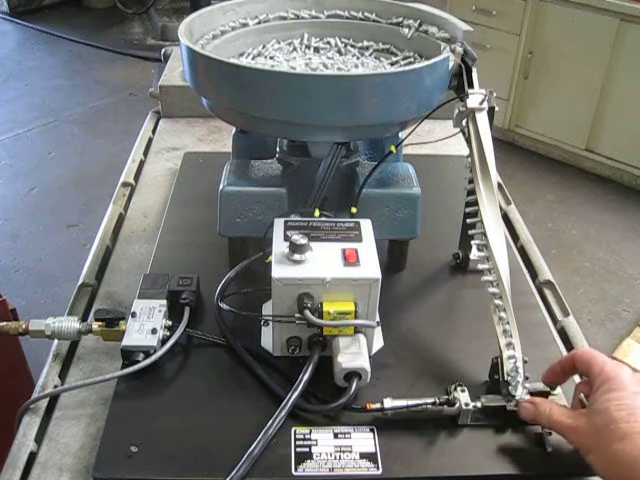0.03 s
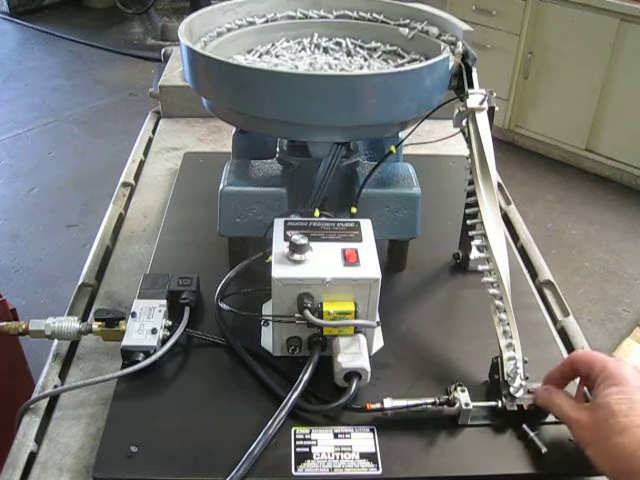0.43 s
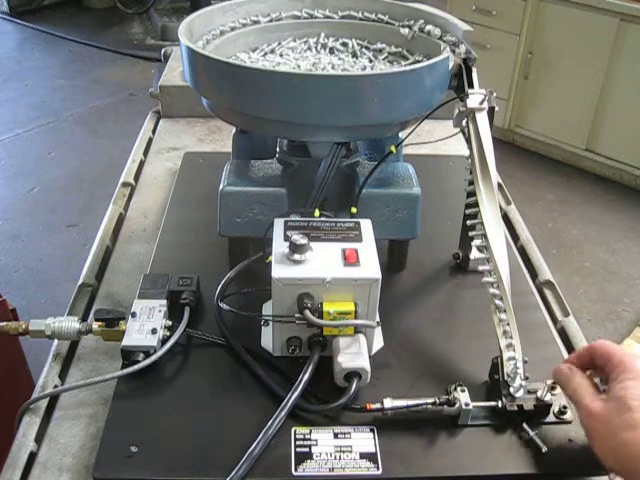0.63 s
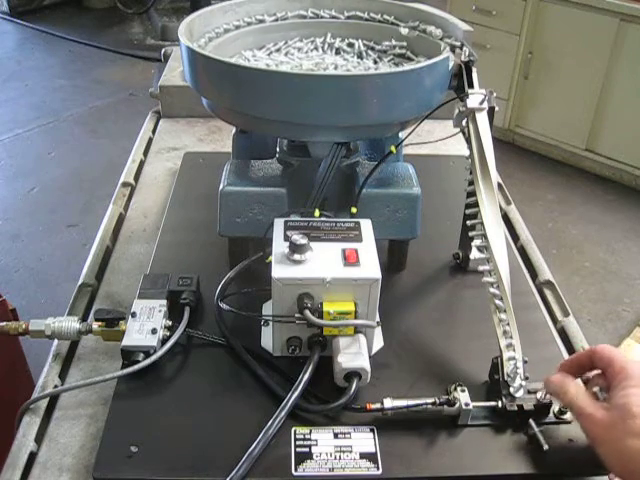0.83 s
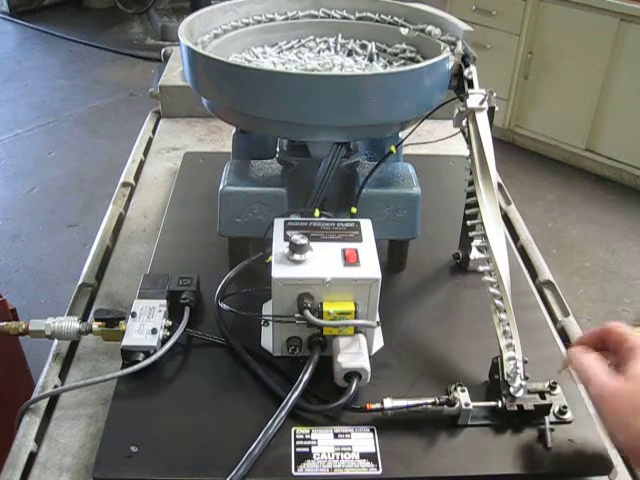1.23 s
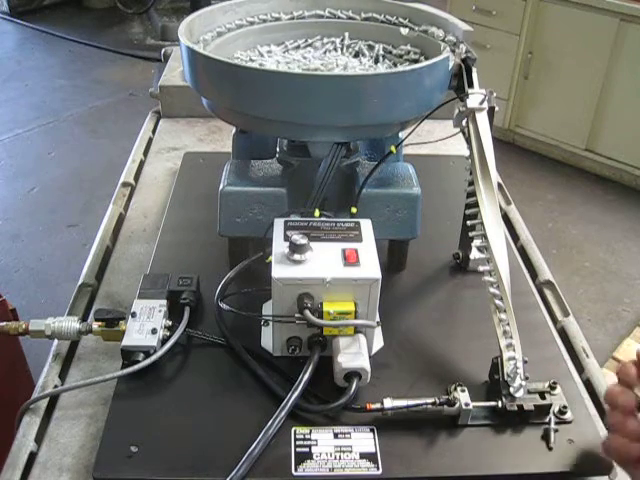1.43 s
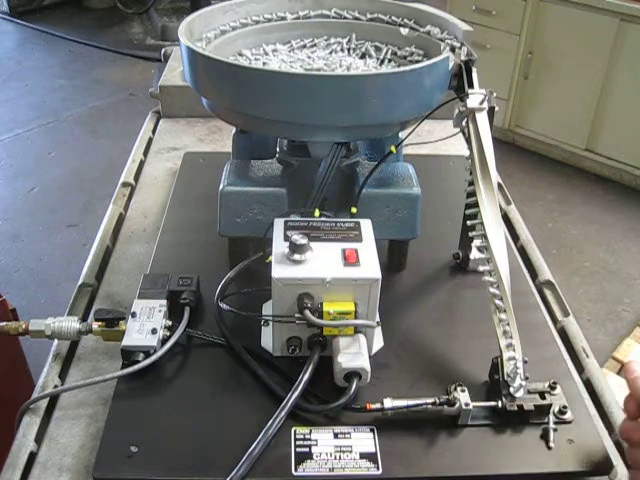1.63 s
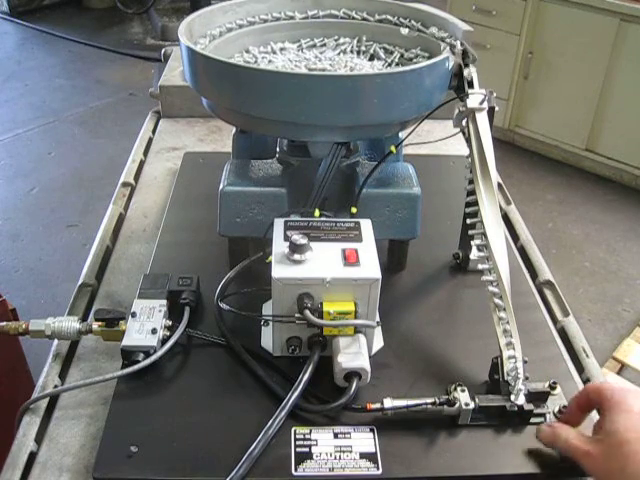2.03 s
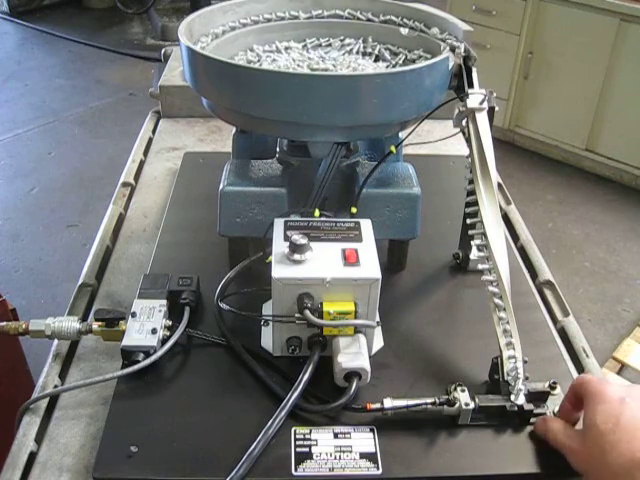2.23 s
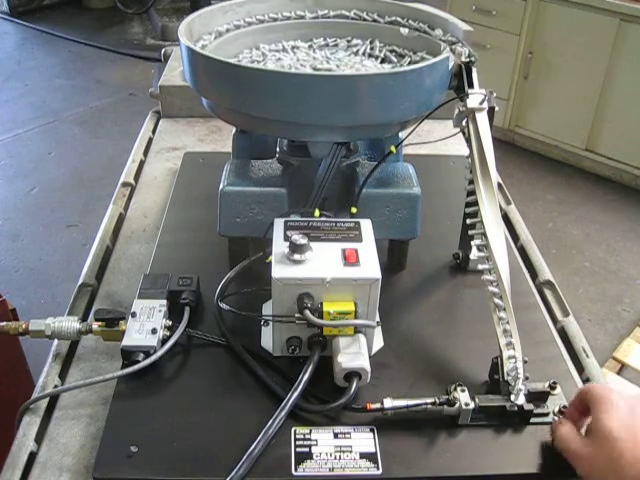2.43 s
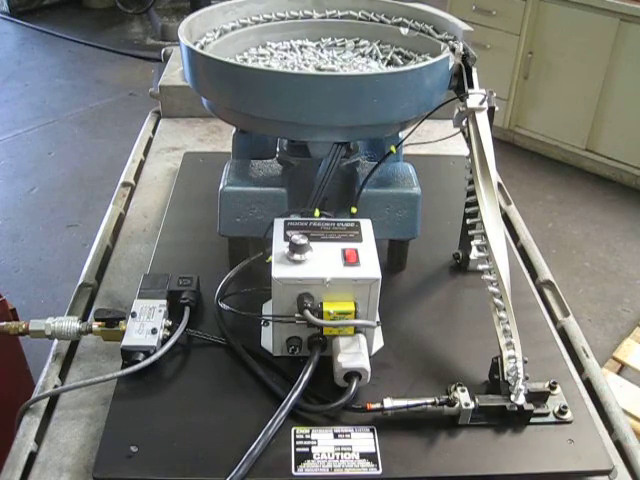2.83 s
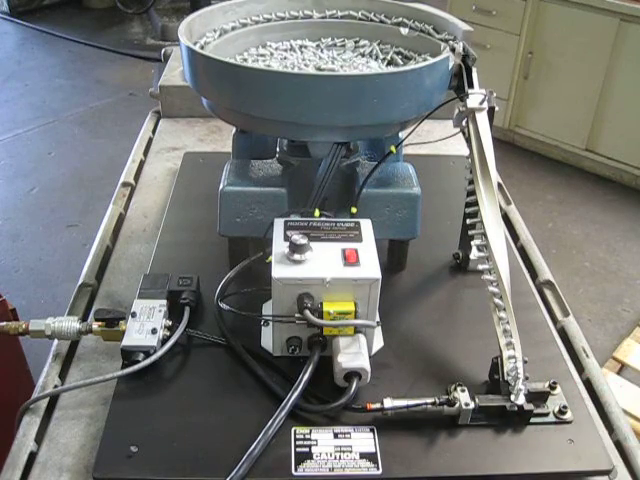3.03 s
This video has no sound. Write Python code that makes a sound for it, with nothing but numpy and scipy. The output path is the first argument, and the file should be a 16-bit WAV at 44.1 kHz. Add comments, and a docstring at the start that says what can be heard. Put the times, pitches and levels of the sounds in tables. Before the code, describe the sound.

A vibrating bowl feeder rattles metal studs, pausing with an air hiss and clack, then restarting.

```python
"""A vibratory bowl feeder rattles a heap of steel studs in its ringing bowl, tossed by a humming magnet.
It starts, runs, dies down as a pneumatic slide hisses, squeaks and slams at the track end,
then restarts and stops again. The slam leaves a lingering ring. Single studs clack on the track
and the bench gives a few dull booms. The hard workshop answers briefly, over a low rumble."""
import sys
import numpy as np
from scipy import signal
from scipy.fft import rfft, irfft, next_fast_len
from scipy.io import wavfile
from scipy.ndimage import map_coordinates

SR = 44100
rng = np.random.default_rng(int(sys.argv[2]) if len(sys.argv) > 2 else 0)


def transcribe(u):
    """Save the signal u as a 16-bit wav file named by the first command-line argument.

    u: samples, shape (n,) or (channels, n), limited to [-1, 1]; the rate is SR.
    q: integer samples, one column per channel.
    """
    v = np.clip(np.atleast_2d(u).T, -1, 1)
    q = np.round(v * 32767).astype(np.int16)
    wavfile.write(sys.argv[1], SR, q)


N = 136710
SHAKE_HZ, FULL_DRIVE_DB = 120, -43
STRIKE_DB = 12  # a first contact, above the flurry that follows

# The rattle's broad tone. Each row: frequency in Hz, gain in dB.
RATTLE_EQ = [(150, -29.5), (400, -16), (720, -7), (1100, 1), (5000, -3.5), (8500, -6.5), (11000, -11),
             (13000, -20.5), (15800, -29.5)]
# Resonances of bowl and studs. Each row: centre in Hz, width in Hz, lift in dB.
BOWL_MODES = [(652, 25, 9), (1495, 90, -7), (1620, 110, 5.5), (1809, 72, 5), (1938, 55, 6.5),
              (2226, 105, 8), (2425, 70, -6.5), (2728, 35, 6), (2925, 140, 6), (3121, 46, 10.5),
              (3542, 105, 11), (3830, 220, 4.5), (3982, 70, 9.5), (4115, 70, 7), (4510, 55, 6),
              (5560, 380, 10.5), (5694, 32, 6.5), (5922, 35, 5), (6270, 650, 8.5), (6743, 105, 11),
              (7192, 100, 4.5), (8075, 650, 9), (8671, 190, 8), (9143, 80, 9), (9421, 35, 11),
              (9824, 45, 10), (10203, 310, 10), (10775, 260, 7), (11266, 145, 7.5), (12371, 520, 8),
              (14350, 400, 10)]
def rattle(body_db, treble_db):
    """Tossed studs ring the bowl's main resonances and a thicket of fine ones; the treble pulses most."""
    fine_db = 1.2 * rng.standard_normal(400)
    fine_hz = np.linspace(0, SR / 2, len(fine_db))
    bowl = lambda hz: along(RATTLE_EQ, hz) + lifts(BOWL_MODES, hz) + np.interp(hz, fine_hz, fine_db)
    low_share = lambda hz: 1 / (1 + (hz / 2770) ** 8)  # crossover from body to treble
    body_eq = lambda hz: bowl(hz) + 10 * np.log10(low_share(hz) + 1e-9)
    treble_eq = lambda hz: bowl(hz) + 10 * np.log10(1 - low_share(hz) + 1e-9)
    body = unit(coloured(impacts(pulsing=0.14), body_eq))
    treble = unit(coloured(impacts(pulsing=0.42), treble_eq))
    jostle = amp(0.39 * wobble(50))
    return jostle * (amp(body_db - 1) * body + amp(treble_db) * sizzle(treble, treble_db))


def impacts(pulsing, per_s=6500, spread_db=2.5):
    """Stud contacts of random size crowd into one part of each shake."""
    shake = 1 + pulsing * np.cos(2 * np.pi * SHAKE_HZ * np.arange(N) / SR)
    hit = rng.random(N) < shake * per_s / SR
    return hit * rng.choice([-1, 1], N) * amp(spread_db * rng.standard_normal(N))


def sizzle(treble, treble_db, corner_hz=10700, neutral_db=-32.5):
    """Harder contacts are shorter, so the top of the rattle grows faster than the rest."""
    hz = np.fft.rfftfreq(N, 1 / SR)
    top = irfft(rfft(treble) / (1 + (corner_hz / (hz + 1)) ** 10), N)
    return treble + top * (amp(0.45 * (treble_db - neutral_db)) - 1)


# The hum's partials. Each row: harmonic number, offset in dB at full drive, dB gained per dB of drive.
HUM_PARTIALS = [(1, 0.5, 1.5), (2, -9.5, 1.54), (3, -3, 1.48), (4, -19, 1.6), (5, -16.5, 1)]
def magnet_hum(drive_db, overtone_lag_s=0.04):
    """The magnet pulls twice per mains cycle; its overtones swell later and waver more."""
    t = np.arange(N) / SR
    late_db = np.minimum(drive_db, np.interp(t - overtone_lag_s, t, drive_db))
    out = np.zeros(N)
    for k, offset_db, growth in HUM_PARTIALS:
        push_db = (late_db if k > 1 else drive_db) - FULL_DRIVE_DB
        waver_db = 0.25 * k * wobble(8.84)
        level = amp(FULL_DRIVE_DB + offset_db + growth * push_db + waver_db)
        out += np.sqrt(2) * level * np.sin(2 * np.pi * (k * SHAKE_HZ * t + rng.random()))
    return out


# The shell's lowest modes. Each row: centre in Hz, width in Hz, lift in dB.
SHELL_MODES = [(831, 60, 20.5), (884.3, 43, 19.5)]
def bowl_shell(drive_db):
    """Only a hard shake throws the heap enough to ring the bowl's hollow shell."""
    eq = lambda hz: lifts(SHELL_MODES, hz) - 20 * np.abs(np.log2((hz + 1) / SHELL_MODES[0][0]))
    level_db = -42.5 + 1.92 * (drive_db - FULL_DRIVE_DB)
    return amp(level_db) * unit(coloured(impacts(pulsing=0.14), eq))


# Stud clacks and the slam's after-ring. Each row: start in seconds, level in dB,
# ring centre and width in Hz, ring lift in dB, hold and t60 in seconds.
METAL_RINGS = [(0.08, -40.5, 3820, 3000, 7, 0.0049, 0.024), (0.214, -25, 2270, 2400, 12, 0.0049, 0.016),
               (1.192, -22.5, 2480, 2000, 1, .005, 0.019), (1.252, -24.5, 5800, 2500, 9, 0.008, 0.028),
               (1.425, -21.5, 9700, 5000, 10, 0.0036, 0.043), (1.774, -36.5, 1720, 300, 17, .03, 0.44),
               (2.0583, -38, 4500, 4000, 9, 0.0018, 0.015), (2.089, -32.5, 1860, 1490, 6, 0.012, 0.05),
               (2.147, -26.5, 11100, 5000, 4, 0.0045, .04), (2.7155, -28, 3020, 500, 16, 0.0066, 0.02),
               (2.7741, -24.5, 9400, 2500, 16, 0.0018, 0.017),
               (2.7757, -20, 2000, 1100, 14.5, 0.0027, 0.023),
               (2.788, -34.5, 1400, 1300, 14, 0.0058, 0.027), (2.81, -26, 5700, 620, 6, 0.0027, 0.015),
               (2.844, -24.5, 5350, 2400, 15, 0.0003, 0.0036), (3.072, -44.5, 3560, 3500, 12, 0.0019, .02)]
# The tone they all share. Each row: frequency in Hz, gain in dB.
METAL_EQ = [(200, -57), (650, -5.5), (1100, 1.5), (8000, 3.5), (11000, -3), (16000, -19)]
def clacks_and_after_ring():
    """Stud clacks, each with its own ring, plus a lingering ring near 1.7 kHz just after the slam."""
    out = np.zeros(N)
    for start, db, centre, width, lift, hold, t60 in METAL_RINGS:
        eq = lambda hz: along(METAL_EQ, hz) + lifts([(centre, width, lift)], hz)
        add(out, start, amp(db) * burst(hold, t60, eq, strike=amp(STRIKE_DB)))
    return out


# Valve spurts. Each row: start and hold in seconds, level in dB, t60 in seconds,
# treble tilt in dB per octave.
AIR_SPURTS = [(1.634, 0.0067, -17.5, 0.015, 5), (1.663, 0.0365, -23, 0.015, 2.5)]
# The hiss before its tilt. Each row: frequency in Hz, gain in dB.
AIR_EQ = [(80, -14), (1000, 2.5), (3000, -0.5), (5000, 3), (9000, 1), (10000, -3), (11300, 0.5),
          (13500, -10), (16000, -15)]
def valve_hiss():
    """The slide's valve lets out short, bright jets of air."""
    out = np.zeros(N)
    for start, hold, db, t60, tilt in AIR_SPURTS:
        eq = lambda hz: along(AIR_EQ, hz) + tilt * np.log2(1 + hz / 1000)
        add(out, start, amp(db) * burst(hold, t60, eq))
    return out


# The squeak's partials. Each row: frequency in Hz, relative level in dB.
SQUEAK_PARTIALS = [(6150, -2.5), (10400, -11), (11900, -8)]
def slide_squeak(start_s=1.6428, level_db=-11.5):
    """The slide gives a tiny, high squeak as it sets off."""
    out = np.zeros(N)
    for hz, db in SQUEAK_PARTIALS:
        add(out, start_s, amp(level_db + db) * ring(hz, hold_s=0.0017, t60_s=0.013))
    return out


# The end stop's ring. Each row: frequency in Hz, level in dB, t60 in seconds.
STOP_MODES = [(475, -27, 0.045), (1294, -25, 0.038), (1700, -24.5, 0.029), (2180, -23.5, 0.018),
              (3170, -17, 0.026), (3610, -22, 0.016)]
# The struck plate's tone. Each row: frequency in Hz, gain in dB.
PLATE_EQ = [(100, -56), (480, -6), (800, -4), (1600, 0), (3400, 5), (7000, 0.5), (12000, -16), (16000, -22)]
def slide_slam(start_s=1.6985, lag_at_1khz_s=0.0055):
    """The slide slams into its stop; the plate's low bending waves arrive last."""
    plate_eq = lambda hz: along(PLATE_EQ, hz)
    crack = amp(-13.5) * burst(0.0015, 0.02, plate_eq, strike=2 * amp(STRIKE_DB))
    slam = crack + sum(amp(db) * ring(hz, 0.004, t60) for hz, db, t60 in STOP_MODES)
    hz = np.fft.rfftfreq(len(slam), 1 / SR)
    dispersion = np.exp(-4j * np.pi * lag_at_1khz_s * np.sqrt(1000 * hz))
    out = np.zeros(N)
    add(out, start_s, irfft(rfft(slam) * dispersion, len(slam)))
    return out


# Bench thuds. Each row: start in seconds, level in dB, t60 in seconds.
BENCH_HITS = [(0, -46, 0.39), (1.636, -35, 0.057), (1.663, -37, 0.054)]
# The bench's dull tone. Each row: frequency in Hz, gain in dB.
BENCH_EQ = [(50, -15), (130, 7.5), (400, 1.5), (1500, -46)]
def bench_booms():
    """The bench top booms low and briefly."""
    out = np.zeros(N)
    for start, db, t60 in BENCH_HITS:
        add(out, start, amp(db) * burst(0, t60, lambda hz: along(BENCH_EQ, hz)))
    return out


# The reverb's decay. Each row: frequency in Hz, t60 in seconds.
ROOM_DECAY = [(200, 1), (1800, 0.31), (6000, 0.48), (14000, 0.13)]
def workshop_reverb(send):
    """The hard room answers; each frequency dies at its own speed."""
    hz, t, noise = signal.stft(rng.standard_normal(SR // 2), SR, nperseg=256)
    decay = amp(-60 * t / along(ROOM_DECAY, hz)[:, None])
    tail = signal.istft(noise * decay, SR, nperseg=256)[1]
    return signal.fftconvolve(send, tail / np.linalg.norm(tail))[:N]


# The room tone's shape. Each row: frequency in Hz, gain in dB.
RUMBLE_EQ = [(25, -8), (58, 4.5), (80, -4), (210, -7.5), (1000, -24), (4000, -13), (16000, -42)]
def room_tone(level_db=-57.5):
    """A steady, low rumble fills the workshop."""
    return amp(level_db) * unit(coloured(rng.standard_normal(N), lambda hz: along(RUMBLE_EQ, hz)))


def amp(db):
    """Decibels to amplitude."""
    return 10 ** (np.asarray(db) / 20)


def unit(x):
    """x scaled to an rms of 1."""
    return x / np.sqrt(np.mean(x ** 2) + 1e-20)


def along(points, hz):
    """A curve through (Hz, value) points on a log frequency axis."""
    knots_hz, values = np.transpose(points)
    return np.interp(np.log(hz + 1), np.log(knots_hz + 1), values)


def lifts(modes, hz):
    """The dB added by bell-shaped resonances."""
    return sum(db / (1 + (2 * (hz - centre) / width) ** 2) for centre, width, db in modes)


def wobble(knots_per_s):
    """A smooth random curve."""
    return map_coordinates(rng.standard_normal(2048), [np.arange(N) * knots_per_s / SR], mode="wrap")


def coloured(x, eq):
    """x through a minimum-phase filter; eq maps Hz to dB."""
    size = 2 * next_fast_len(len(x) // 2 + 4096)
    gain = amp(eq(np.fft.rfftfreq(size, 1 / SR)))
    cepstrum = irfft(np.log(gain + 1e-6), size)
    cepstrum[1:size // 2] *= 2
    cepstrum[size // 2 + 1:] = 0
    return irfft(rfft(x, size) * np.exp(rfft(cepstrum)), size)[:len(x)]


def burst(hold_s, t60_s, eq, strike=0):
    """An optional strike, then a held and dying flurry of contacts or air, rung through eq."""
    t = np.arange(SR // 4) / SR
    env = amp(-60 * np.maximum(t - hold_s, 0) / t60_s)
    excitation = env * rng.standard_normal(len(t)) + strike * (t == 0)
    return unit(coloured(excitation, eq)) * np.sqrt(np.mean(env ** 2))


def ring(hz, hold_s, t60_s):
    """One slightly unsteady mode swells over the first half of its hold, then dies after it."""
    t = np.arange(SR // 4) / SR
    env = np.minimum(2 * t / hold_s, 1) * amp(-60 * np.maximum(t - hold_s, 0) / t60_s)
    drift = 0.015 * np.cumsum(rng.standard_normal(len(t)))
    return np.sqrt(2) * env * np.sin(2 * np.pi * hz * t + drift)


def add(out, start_s, x):
    """Mix x into out from start_s on."""
    part = out[round(start_s * SR):][:len(x)]
    part += x[:len(part)]


# The feeder's fader moves. Each row: time in seconds, then magnet drive, rattle body and treble in dB.
FEEDER_FADERS = [(0, -47.5, -38.5, -34), (0.06, -50, -46.5, -42), (0.11, -58.5, -48.5, -46.5),
                 (0.16, -52, -49, -45), (0.22, -43.5, -34, -29.5), (0.3, -42, -33, -28),
                 (0.48, -44, -36, -29), (0.62, -41.5, -33, -28), (1.14, -41, -32, -27),
                 (1.24, -41, -30, -24.5), (1.33, -39.5, -30.5, -26.5), (1.42, -40, -27, -25.5),
                 (1.5, -41, -31, -26.5), (1.63, -39.5, -31, -25), (1.655, -47.5, -43, -38),
                 (1.74, -50, -38, -38.5), (1.92, -46.5, -42, -36), (2.0, -55, -52.5, -46.5),
                 (2.07, -55.5, -53.5, -49.5), (2.11, -45.5, -37, -33.5), (2.18, -42.5, -32, -28.5),
                 (2.46, -43, -35.5, -29), (2.56, -40.5, -30.5, -26.5), (2.68, -43.5, -34.5, -28.5),
                 (2.76, -48, -47, -40.5), (2.83, -57, -43, -49), (2.89, -65, -52, -50.5),
                 (3.0, -64, -58, -59.5), (3.09, -63, -71, -64)]
def scene():
    """Feeder, clacks and slide in the workshop, in mono."""
    times, *faders = np.transpose(FEEDER_FADERS)
    drive_db, body_db, treble_db = [np.interp(np.arange(N) / SR, times, db) for db in faders]
    studs = rattle(body_db, treble_db)
    hits = clacks_and_after_ring() + valve_hiss() + slide_squeak() + slide_slam() + bench_booms()
    rumble = room_tone()
    feeder = studs + magnet_hum(drive_db) + bowl_shell(drive_db)
    send = amp(-12.5) * (hits + amp(-2.5) * studs)
    return (feeder + hits + workshop_reverb(send) + rumble)[None]


def record(dry):
    """A brick-wall low-pass takes off the very top."""
    size = next_fast_len(N + SR // 2)
    passband = np.fft.rfftfreq(size, 1 / SR) < 15800
    return irfft(rfft(dry, size) * passband, size)[..., :N]


dry = scene()
out = record(dry)
transcribe(out)
```